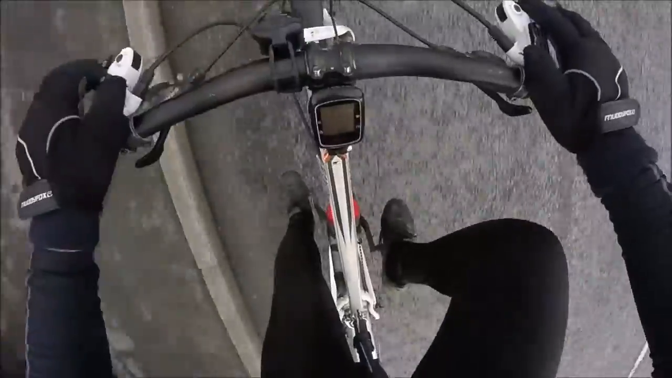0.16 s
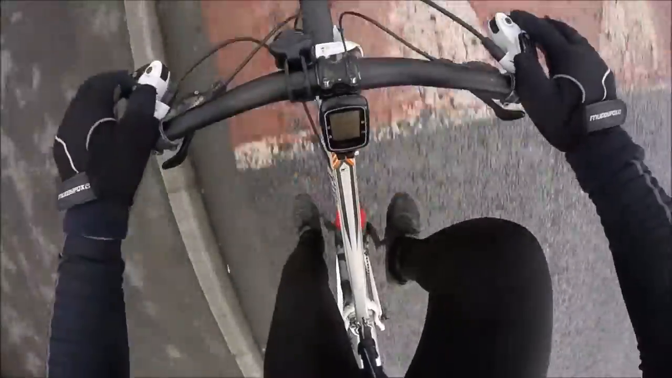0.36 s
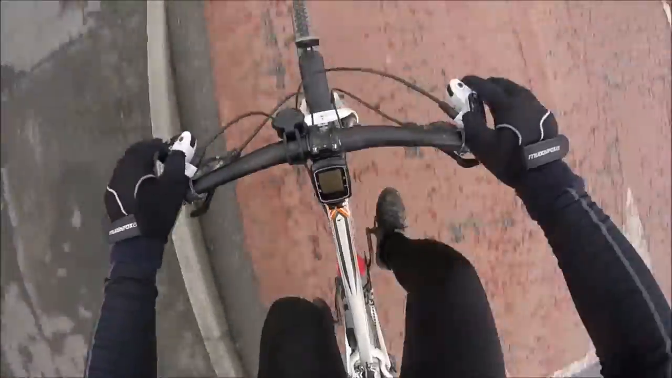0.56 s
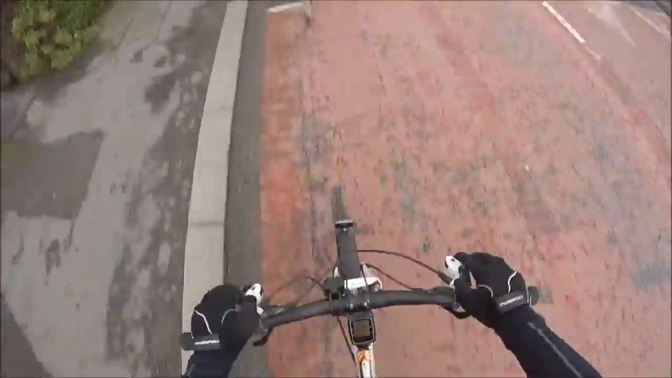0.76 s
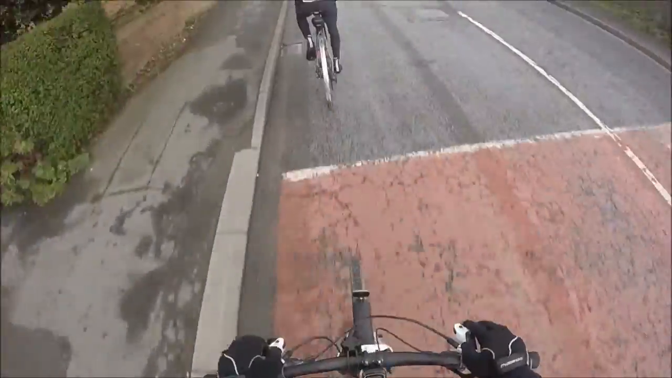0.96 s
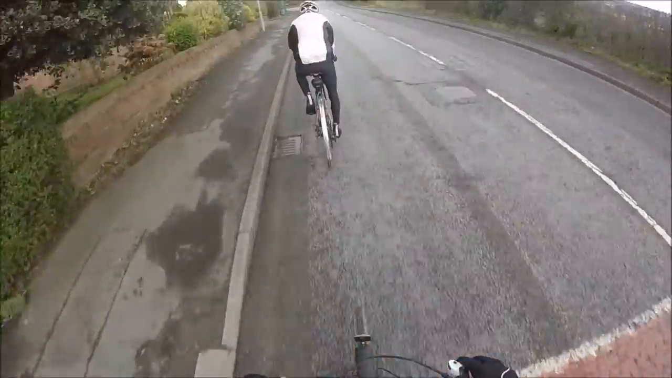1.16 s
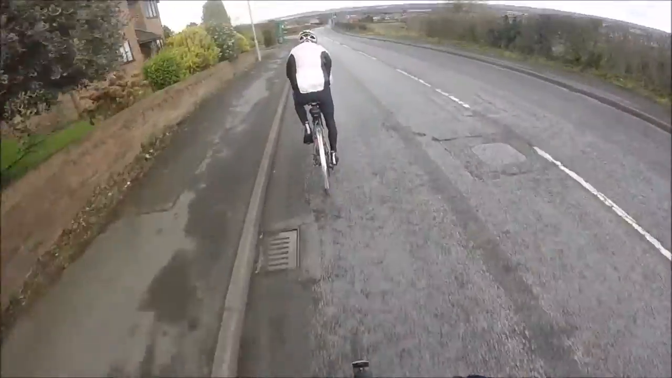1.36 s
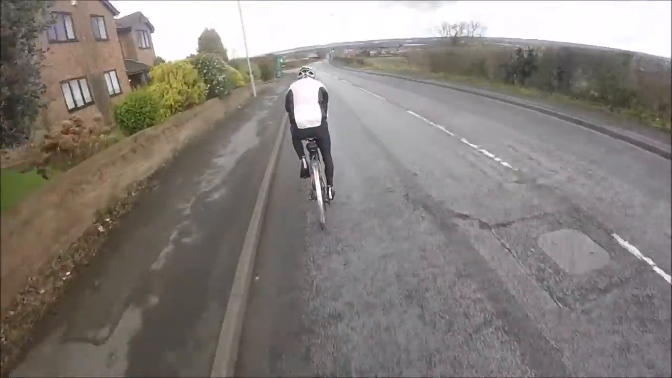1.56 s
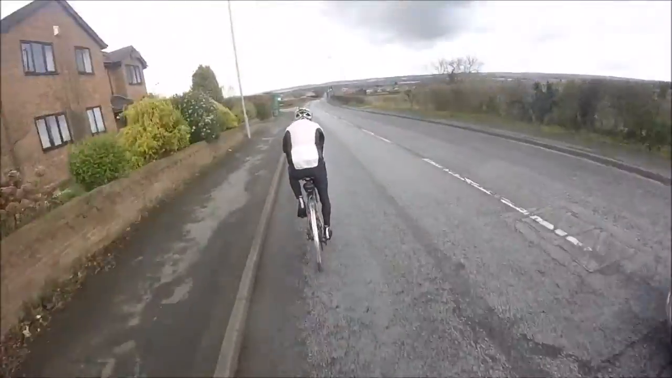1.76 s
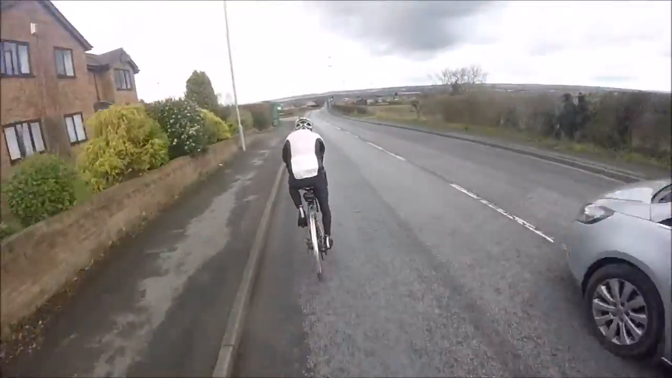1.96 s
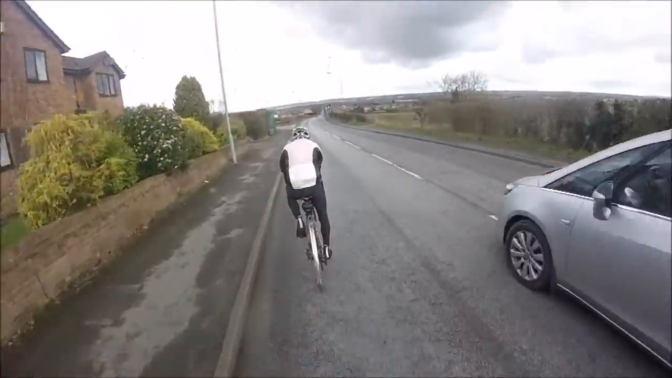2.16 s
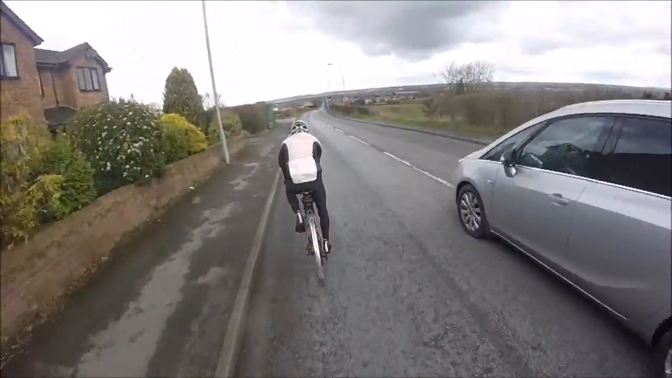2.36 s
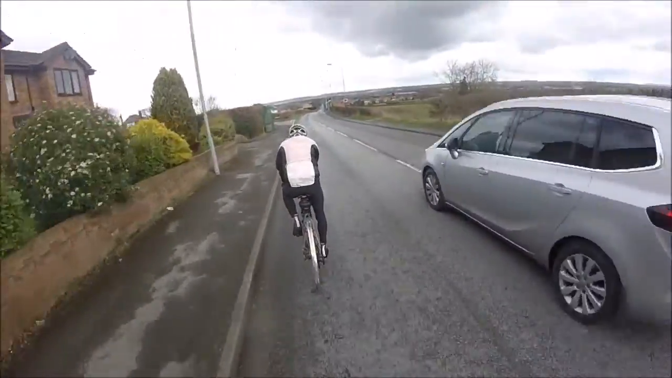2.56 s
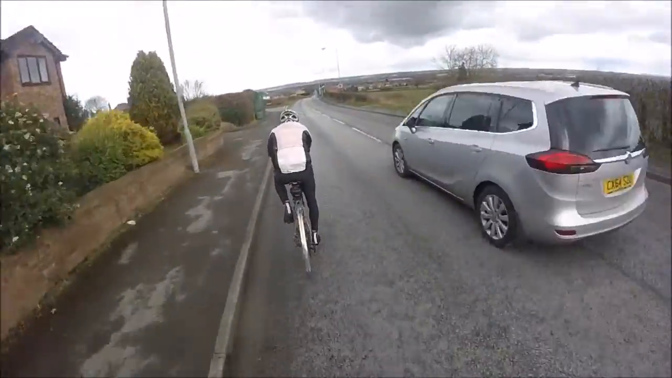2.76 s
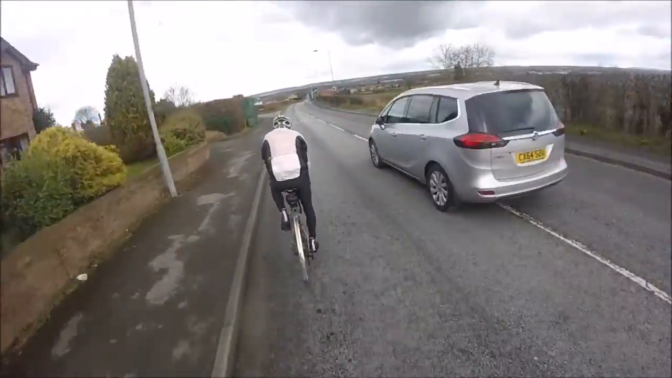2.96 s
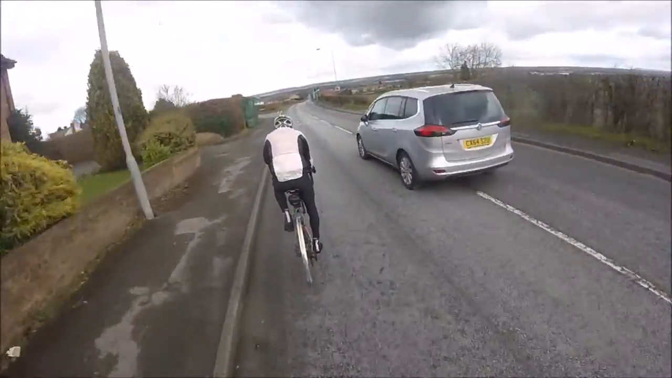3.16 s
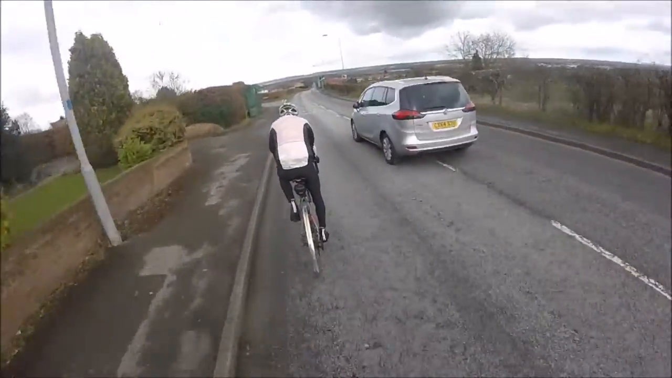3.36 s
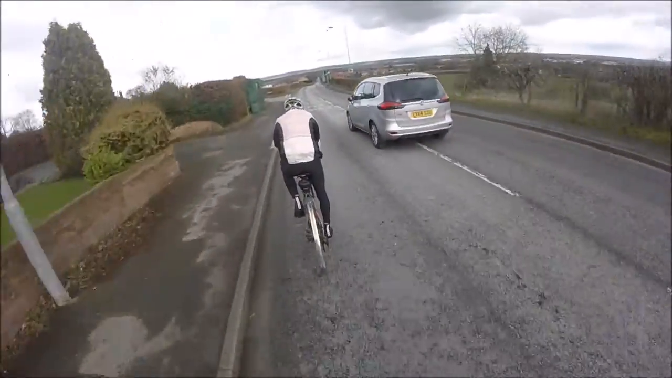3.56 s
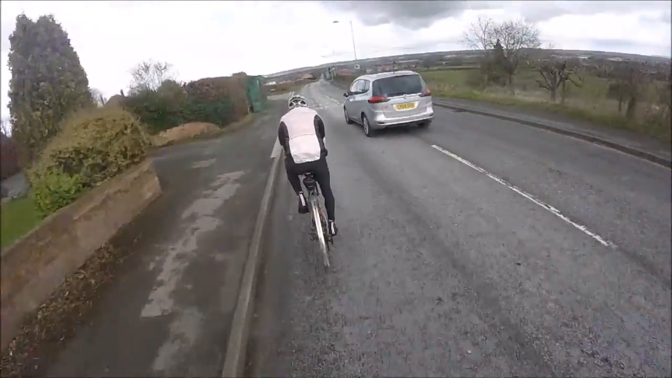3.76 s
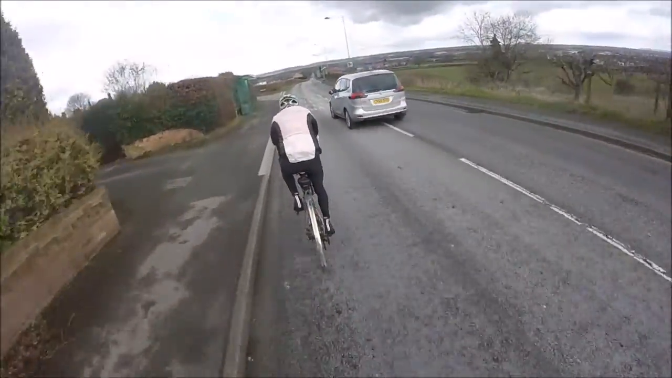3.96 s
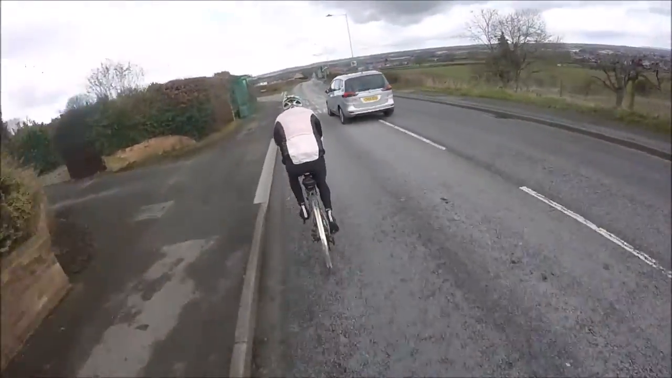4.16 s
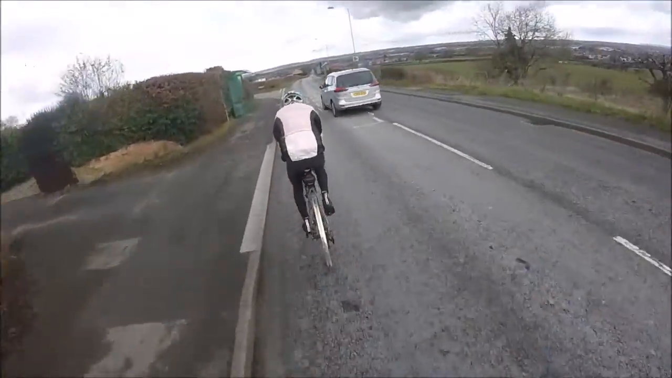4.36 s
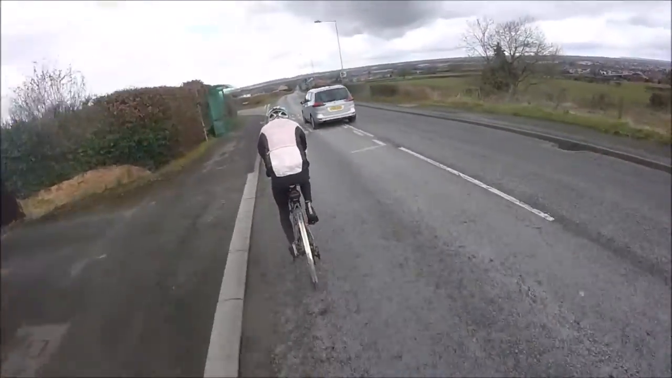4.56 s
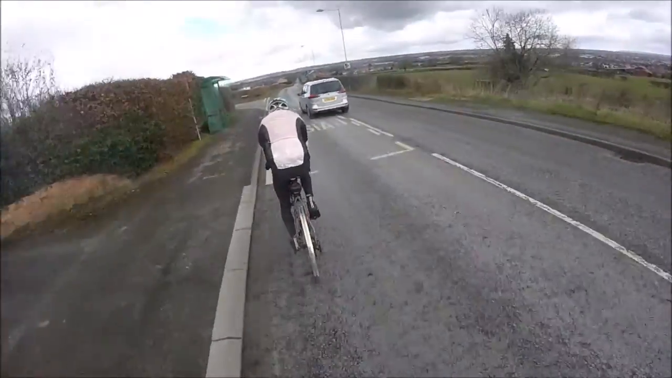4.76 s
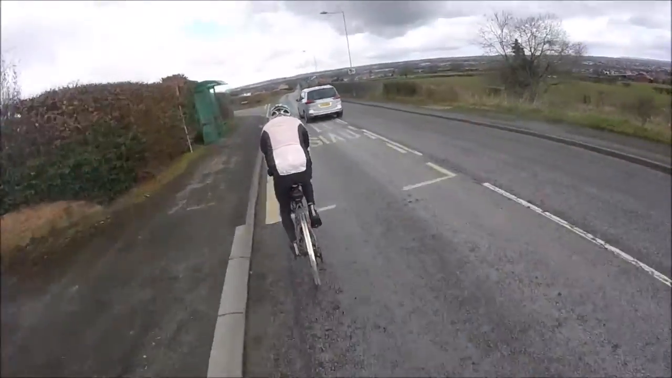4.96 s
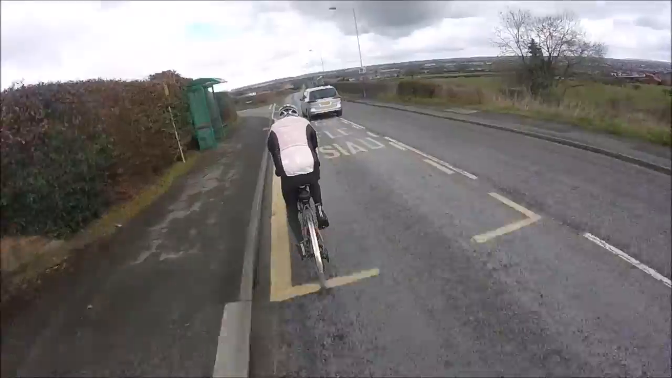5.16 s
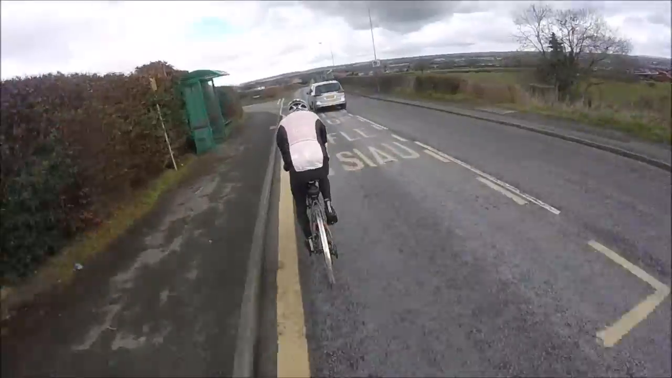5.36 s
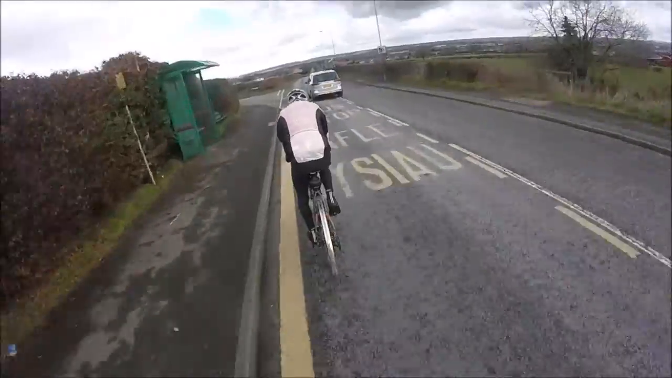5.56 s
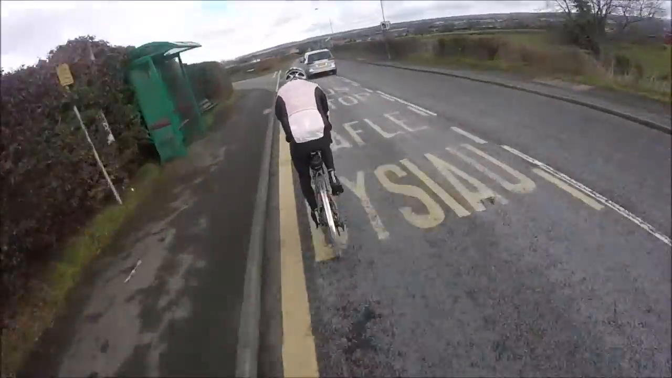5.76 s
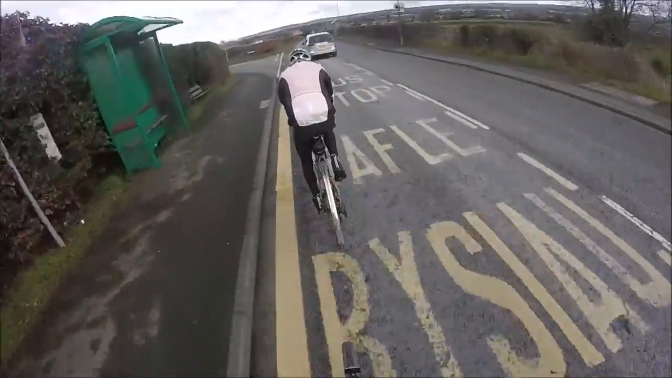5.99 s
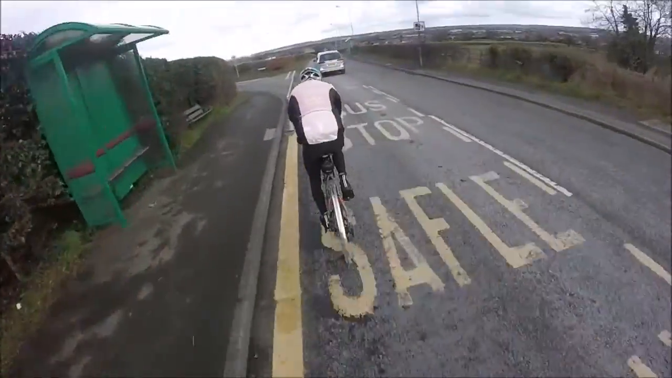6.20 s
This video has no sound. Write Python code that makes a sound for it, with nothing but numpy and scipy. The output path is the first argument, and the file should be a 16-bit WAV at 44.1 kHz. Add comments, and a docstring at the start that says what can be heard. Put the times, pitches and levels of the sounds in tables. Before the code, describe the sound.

Helmet-mounted outdoor capture of a fast bicycle ride. Quiet low rumble and tyre noise open it, then a rising airy swish becomes strong, resonant wind buffeting with treble crackle and sudden slaps of air. A passing car's roar blends in and slowly recedes. Afterwards the wind is weaker and uneven, dropping and gusting, with jolting hum, rough tyre noise and small dry case ticks.

```python
"""Asphalt road: a bicycle rolls fast, a cased camera on the rider's helmet.
As the head lifts, the airstream hits the case: noise driven by random flutter, rung through case resonances.
A car overtakes as a swell of coloured noise; the tyres roar and the mount hums over a low rumble.
A bird chirps faintly as gliding sines; now and then the case clicks, as short decaying noise cracks."""
import sys
import numpy as np
from scipy import signal
from scipy.fft import rfft, irfft, next_fast_len
from scipy.io import wavfile
from scipy.ndimage import uniform_filter1d, map_coordinates

SR = 44100
rng = np.random.default_rng(int(sys.argv[2]) if len(sys.argv) > 2 else 0)


def wrap_up_sound(samples):
    """Save the sound to the file named by the first command line argument, as 16-bit audio."""
    columns = np.atleast_2d(samples).T
    # keep every value between -1 and 1, then stretch to whole-number steps
    tamed = np.clip(columns, -1, 1)
    steps = np.round(tamed * 32767).astype(np.int16)
    wavfile.write(sys.argv[1], SR, steps)


N = 274743
T = np.arange(N) / SR
TOP_HZ = 15020  # band limit of the camera
STRONG_DB = -40  # reference level of a strong stream
LIFT_S, RAISED_S = 0.63, 1.13  # the head starts to lift; it faces forward

# Spectra, relative. Each row: frequency in Hz, density in dB per Hz.
HISS_SPECTRUM = [(200, 0), (3500, -5), (5000, -2.5), (8000, -8), (11000, -14), (15000, -20.5)]
SWAY_SPECTRUM = [(3, -22.5), (9, -4.5), (14, 4), (19, -8.5), (30, -26.5), (100, -66), (1000, -110)]
RUMBLE_SPECTRUM = [(5, -40), (14, -10.5), (30, 4.5), (50, 3.5), (75, 0.5), (130, -14.5), (400, -44.5),
                   (2000, -100)]
HUM_SPECTRUM = [(20, -48), (65, -22), (90, 0.5), (120, -3.5), (150, -9.5), (300, -38.5), (2000, -84)]
CAR_SPECTRUM = [(60, -32), (300, -10), (650, -2), (1000, 5), (1500, 4), (2500, -16), (5000, -47),
                (15000, -53)]
TYRE_SPECTRUM = [(60, -6.5), (150, 4), (230, 5.5), (450, -1), (700, -2.5), (1200, -1.5), (2200, -3.5),
                 (2700, -5.5), (3700, -9.5), (5000, -23.5), (9000, -32), (15000, -49)]
TICK_SPECTRUM = [(500, -11), (1500, -21), (2300, -1.5), (3800, 8.5), (4700, -9), (7500, -17), (14500, -60)]
SWISH_SPECTRUM = [(300, -33), (900, -9), (1400, -10), (1950, -2), (2600, -7), (4000, -15.5), (9000, -40.5)]
JET_SPECTRUM = [(2000, -18), (4700, 7.5), (7000, 5.5), (9500, 4.5), (11000, -11.5), (14500, -21)]
EDDY_SPECTRUM = [(300, -20.5), (700, -12), (1200, 1.5), (2100, -4.5), (3900, -2), (4700, -11), (7500, -31),
                 (10000, -33.5), (14500, -45)]
SPRAY_SPECTRUM = [(1200, -18.5), (2400, -28.5), (3800, 10.5), (4700, -2.5), (7500, -16.5), (10000, -32),
                  (14500, -60)]

# Resonances: springy mount; those that road noise wakes; case, with its notches.
# Each row: centre in Hz, width in Hz, height in dB.
MOUNT_BELLS = [(98, 14, 12), (114.4, 8.5, 7.5)]
BODY_BELLS = [(315.4, 54, 5), (900, 66, 3.5), (1485, 184, 12.5), (1996, 375, 8.5)]
CASE_BELLS = [(1440, 140, 7.5), (1834, 20, 13.5), (2340, 673, 24.5), (2704, 236, -7), (2992, 322, 17),
              (3284, 90, -11), (3534, 300, 11.5), (4690, 170, -6.5), (4973, 150, -3.5), (5380, 400, -13.5),
              (6147, 920, 18), (9100, 1300, 5.5)]

# Shaking of the camera. Each row: time in seconds, relative mount hum in dB, relative rumble in dB.
SHAKE = [(0, -59, -54), (.45, -57, -59), (1.1, -51, -51.5), (1.6, -53, -52.5), (2.4, -48.5, -48.5),
         (2.76, -48.5, -53.5), (2.92, -57, -62.5), (4.2, -58, -59.5), (6.23, -57, -61)]
# Tyres on the asphalt. Each row: time in seconds, relative roar in dB.
ROAD = [(0, -63.5), (.6, -64.5), (1.1, -57), (2.0, -54.5), (2.75, -57), (3.1, -61.5), (4.3, -61),
        (5.65, -63), (6.23, -60.5)]
# Mean airstream on the case. Each row: time in seconds, relative level in dB.
AIR = [(0, -65), (.68, -64), (.95, -59), (1.06, -49.5), (1.42, -43.5), (1.72, -47), (1.92, -41.5),
       (2.55, -41.5), (2.75, -41), (2.89, -43.5), (2.96, -48), (3.7, -48.5), (5.1, -50), (5.26, -45),
       (5.55, -57.5), (5.95, -54), (6.23, -50)]

# Jolts that swell hum and roar. Each row: middle in seconds, length in seconds, hum rise in dB.
JOLTS = [(1.47, .14, 5), (1.93, 0.22, 6.5), (2.18, .16, 4), (2.46, 0.18, 7), (3.24, .14, 4.5),
         (3.53, 0.097, 5), (3.69, 0.091, 4), (4.35, 0.076, 6), (4.56, 0.14, 6.5), (5.14, 0.29, 4.5),
         (5.48, 0.28, 8), (5.8, .12, 3.5)]
# Brief gusts. Each row: middle in seconds, length in seconds, rise in dB.
GUSTS = [(.76, .07, 4), (.88, .07, 2), (1.2, 0.076, 3), (1.87, 0.12, 2.5), (1.97, 0.05, 2.5),
         (2.18, 0.085, 5.5), (2.69, 0.084, 2.5), (3.73, 0.049, 4), (4.81, 0.17, 2.5), (5.06, .07, 3.5),
         (5.44, 0.085, 8), (5.75, 0.16, 6), (5.94, 0.15, 7)]
# Lulls: the stream lets go of the case. Each row: middle in seconds, length in seconds, drop in dB.
LULLS = [(2.322, 0.08, 8.5), (2.57, .05, 7.5), (2.64, 0.059, 7.5), (3.24, 0.14, 7), (4.06, 0.071, 6),
         (4.51, 0.11, 7), (4.855, 0.028, 9), (5.01, 0.095, 12), (5.68, 0.063, 7), (5.84, 0.068, 2.5)]
# Crackle bursts at the case edges. Each row: middle in seconds, length in seconds, rise in dB.
BURSTS = [(1.43, 0.12, 13), (1.56, .16, 6.5), (1.89, .05, 10), (2.15, 0.08, 9.5), (2.24, 0.032, 10),
          (2.68, 0.043, 5), (2.76, .07, 4)]

# Bird notes. Each row: start in seconds, length in seconds, start, middle and end pitch in Hz,
# relative level in dB.
CHIRPS = [(0.53, 0.092, 6530, 6000, 6070, -74), (0.615, .062, 4430, 5450, 5800, -73),
          (0.735, .04, 5000, 5300, 5450, -72), (3.16, .07, 7900, 7500, 7400, -83)]
# Clicks of the case. Each row: start in seconds, peak in dB.
CLICKS = [(1.079, -37), (1.889, -28), (4.479, -35), (5.580, -39)]
# Sudden slaps of air. Each row: start in seconds, level in dB, 60 dB decay in seconds.
SLAPS = [(1.851, -37, 0.06), (2.347, -33, 0.16), (5.606, -45.5, 0.099)]
# Swish resonance. Columns: centre with head down in Hz, with head up in Hz.
SWISH_HZ = (1770, 2150)
# Case edges in the stream. Columns: turning in, fully in, leaving, out, all in seconds.
EXPOSED_S = (.85, 1.1, 2.85, 3.1)


def amp(db):
    """Decibels to gain."""
    return 10 ** (np.asarray(db) / 20)


def unit(x):
    """Scale to rms 1."""
    return x / np.sqrt(np.mean(x ** 2) + 1e-20)


def curves(rows):
    """One value per sample for each column after the time."""
    s, *cols = np.transpose(rows)
    return [np.interp(T, s, c) for c in cols]


def wobble(rate_hz):
    """Smooth random curve through rate_hz random knots a second."""
    knots = rng.standard_normal(int(N * rate_hz / SR) + 4)
    return map_coordinates(knots, [T * rate_hz])


def swells(rows):
    """Sum of smooth cosine-squared bumps in dB."""
    total_db = 0
    for middle_s, length_s, db in rows:
        phase = np.clip((T - middle_s) / length_s, -.5, .5)
        total_db = total_db + db * np.cos(np.pi * phase) ** 2
    return total_db


def colour(x, slope, bells=()):
    """Causal minimum-phase filter: broad slope plus bell-shaped resonances."""
    m = 2 * next_fast_len(N // 2 + 8192)
    hz = np.fft.rfftfreq(m, 1 / SR)
    slope_hz, slope_db = np.transpose(slope)
    db = np.interp(np.log(hz + 1), np.log(slope_hz + 1), slope_db)
    for centre_hz, width_hz, height_db in bells:
        db = db + height_db / (1 + (2 * (hz - centre_hz) / width_hz) ** 2)
    # Folding the cepstrum makes the response causal.
    cepstrum = irfft(np.log(amp(db)), m)
    cepstrum[1:m // 2] *= 2
    cepstrum[m // 2 + 1:] = 0
    response = np.exp(rfft(cepstrum))
    return irfft(rfft(x, m) * response, m)[:N]


def rush(slope, bells=(), drive=1):
    """Coloured noise of rms 1, shaken by drive before it rings."""
    return unit(colour(drive * rng.standard_normal(N), slope, bells))


def held(x, window_s):
    """Even out the slow swells of a narrow noise."""
    power = np.abs(uniform_filter1d(x ** 2, int(window_s * SR)))
    return x / np.sqrt(power + 1e-6)


def hiss(level_db=-76):
    """Faint even noise."""
    return amp(level_db) * rush(HISS_SPECTRUM)


def sway(level_db=-49):
    """Slow pressure swings as steady very low noise."""
    return amp(level_db) * rush(SWAY_SPECTRUM)


def rumble(gain_db=-1.0, buffet_db=1.8):
    """Low pressure noise, evened out, then buffeted at random."""
    _, pressure_db = curves(SHAKE)
    level_db = pressure_db + gain_db + buffet_db * wobble(11)
    return amp(level_db) * held(rush(RUMBLE_SPECTRUM), 0.24)


def mount_hum(throb_db=1.33):
    """Road and wind shake the springy mount, which hums at its resonances."""
    mount_db, _ = curves(SHAKE)
    level_db = mount_db + swells(JOLTS) + throb_db * wobble(14)
    return amp(level_db) * held(rush(HUM_SPECTRUM, MOUNT_BELLS), 0.11)


def bird(waver=0.0086, tremble_db=3.0, gain_db=-3):
    """Thin slurred whistles: sines on quadratic glides with random waver."""
    out = np.zeros(N)
    for start_s, length_s, start_hz, middle_hz, end_hz, db in CHIRPS:
        u = np.clip((T - start_s) / length_s, 0, 1)
        glide = np.polyfit([0, .5, 1], [start_hz, middle_hz, end_hz], 2)
        hz = np.polyval(glide, u) * (1 + waver * wobble(330))
        envelope = 2 * np.sqrt(2 * u * (1 - u))
        out += amp(db) * envelope * np.sin(2 * np.pi * np.cumsum(hz) / SR)
    return out * amp(gain_db + tremble_db * wobble(150))


def car(level_db=-57, loudest_s=3.02, passing_s=0.82):
    """Roar of the overtaking car, swelling to its loudest and fading evenly."""
    distance = np.hypot(1, (T - loudest_s) / passing_s)  # 1 at the loudest, growing either side
    return amp(level_db) / distance * rush(CAR_SPECTRUM, BODY_BELLS)


def tyres(gain_db=5.0, rough_db=1.2, jolt_share=0.23):
    """Tread drums on the coarse asphalt, harder at each jolt."""
    road_db, = curves(ROAD)
    level_db = road_db + gain_db + jolt_share * swells(JOLTS)
    roughness = amp(rough_db * wobble(60))
    return amp(level_db) * rush(TYRE_SPECTRUM, BODY_BELLS, roughness)


def clicks(t60_s=0.021):
    """The case ticks in its mount: a short crack through its own resonances."""
    out = np.zeros(N)
    ring = colour(signal.unit_impulse(N), TICK_SPECTRUM, CASE_BELLS)[:SR // 20]
    t = np.arange(len(ring)) / SR
    for start_s, peak_db in CLICKS:
        crack = rng.standard_normal(len(t)) * amp(-60 * t / t60_s)
        tick = signal.fftconvolve(crack, ring)
        out[round(start_s * SR):][:len(tick)] += amp(peak_db) * tick / np.abs(tick).max()
    return out


def swish(level_db=-54, full_s=1.0, hold_s=0.68, rise_db_per_s=40, fall_db_per_s=45,
          flutter_db=5.0, width_hz=420, peak_db=9):
    """Air meets the rising case at a glancing angle: a duller swish, crossfaded up in pitch."""
    rise_db = rise_db_per_s * np.maximum(full_s - T, 0)
    fall_db = fall_db_per_s * np.maximum(T - full_s - hold_s, 0)
    low, high = (rush(SWISH_SPECTRUM, [(hz, width_hz, peak_db)], amp(flutter_db * wobble(80)))
                 for hz in SWISH_HZ)
    raised = np.interp(T, [LIFT_S, RAISED_S], [0, 1])
    return amp(level_db - rise_db - fall_db) * (np.sqrt(1 - raised) * low + np.sqrt(raised) * high)


def slaps(rise_s=0.0012):
    """Single large eddies hit the case at once and die away."""
    force = np.zeros(N)
    for start_s, db, t60_s in SLAPS:
        age_s = np.maximum(T - start_s, 0)
        force += amp(db - 60 * age_s / t60_s) * (1 - np.exp(-age_s / rise_s))
    return force * rush(EDDY_SPECTRUM, CASE_BELLS)


def fizz(air_db, strong_level_db=-70.5, growth=1.1, unrest_db=2.0, flutter_db=3.5, grain_db=4.0):
    """Fine eddies shed from the exposed case edges crackle in bursts."""
    exposed = np.interp(T, EXPOSED_S, [0, 1, 1, 0])
    spatter = amp(unrest_db * wobble(30) + flutter_db * wobble(160) + grain_db * wobble(2500))
    level_db = strong_level_db + growth * (air_db - STRONG_DB) + swells(BURSTS)
    return exposed * amp(level_db) * rush(JET_SPECTRUM, drive=spatter)


def flow(unrest_db=0.86):
    """Strength of the air on the case in dB: mean stream, gusts, lulls and slight unrest."""
    air_db, = curves(AIR)
    return air_db + swells(GUSTS) - swells(LULLS) + unrest_db * wobble(28)


def airstream(air_db, body_gain_db=0.01, shelter_db=-4.0, strong_spray_db=-49, spray_growth=2.3,
              flutter_db=1.28, grain_db=2.05):
    """Eddies break on the case and ring it; the treble spray grows faster than the body."""
    air_db = air_db + np.interp(T, [LIFT_S, RAISED_S], [shelter_db, 0])  # lowered head shelters the case
    eddies = amp(flutter_db * wobble(130) + grain_db * wobble(700))
    body = amp(air_db + body_gain_db) * rush(EDDY_SPECTRUM, CASE_BELLS, eddies)
    spray_db = strong_spray_db + spray_growth * (air_db - STRONG_DB)
    spray = amp(spray_db) * rush(SPRAY_SPECTRUM, CASE_BELLS, eddies)
    return body + spray


def scene():
    """All sources summed at one microphone."""
    air_db = flow()
    background = hiss() + sway() + rumble() + mount_hum() + bird() + car()
    ride = tyres() + clicks()
    wind = swish() + slaps() + fizz(air_db) + airstream(air_db)
    return (background + ride + wind)[None]


def record(dry):
    """The camera keeps nothing from its band limit up."""
    m = next_fast_len(N + SR // 2)
    passband = np.fft.rfftfreq(m, 1 / SR) < TOP_HZ
    return irfft(rfft(dry, m) * passband, m)[..., :N]


dry = scene()
out = record(dry)
wrap_up_sound(out)
```